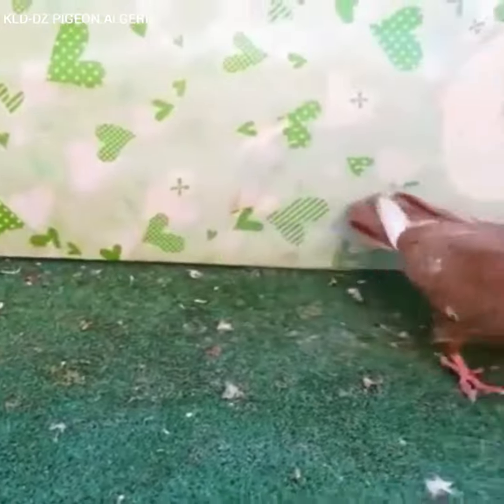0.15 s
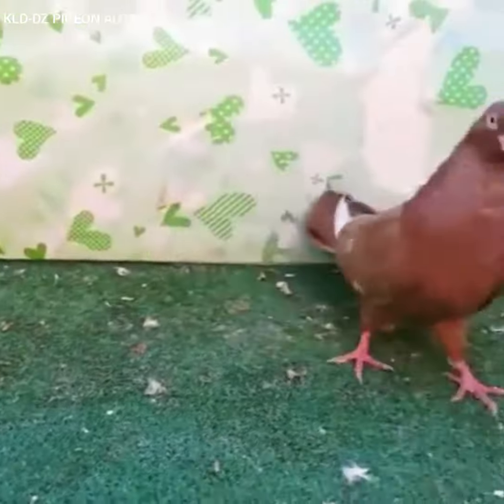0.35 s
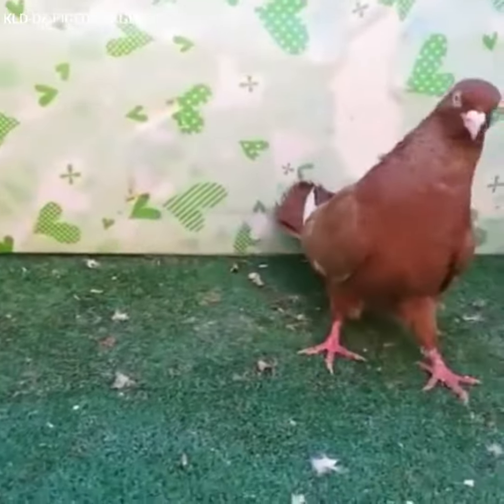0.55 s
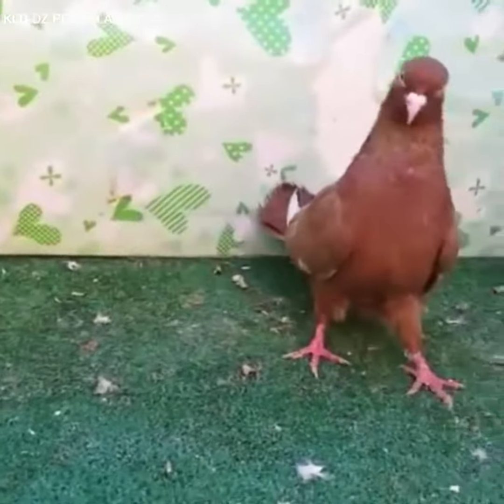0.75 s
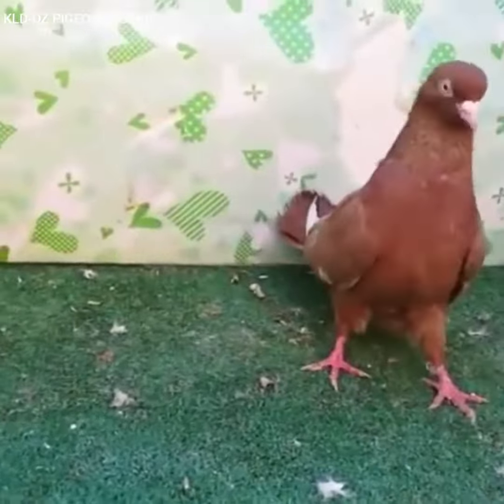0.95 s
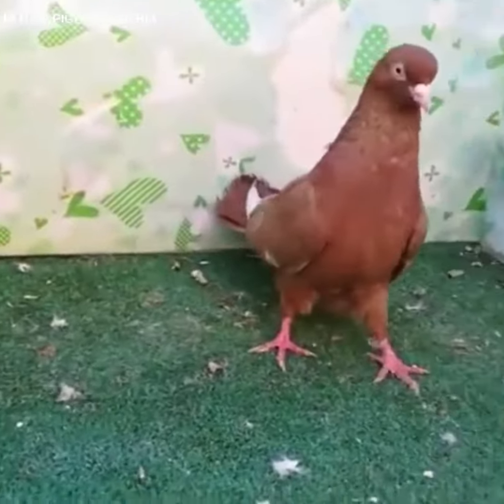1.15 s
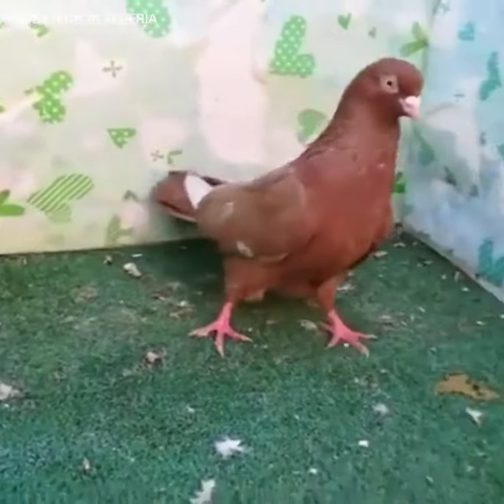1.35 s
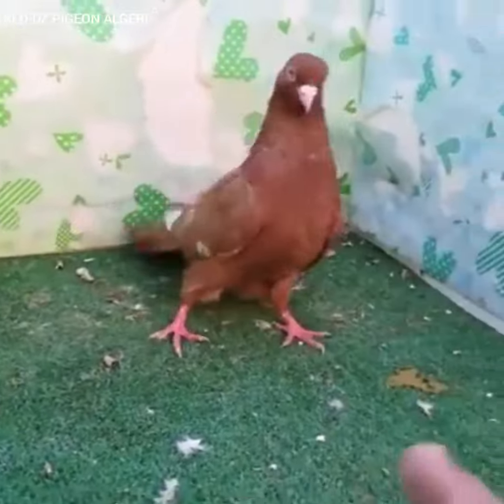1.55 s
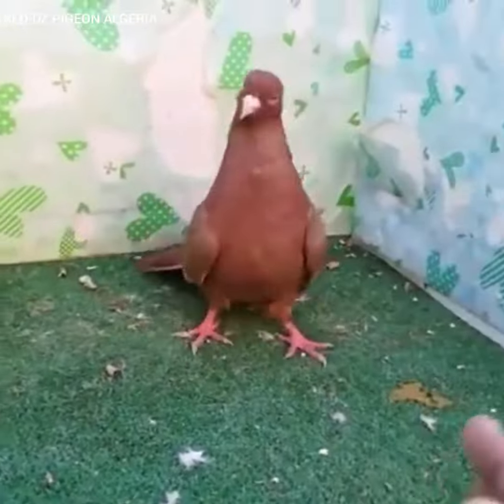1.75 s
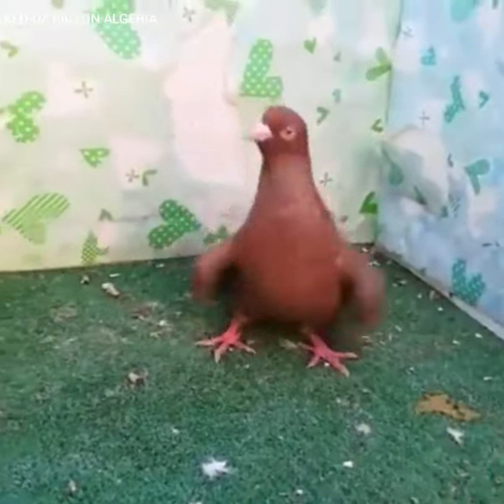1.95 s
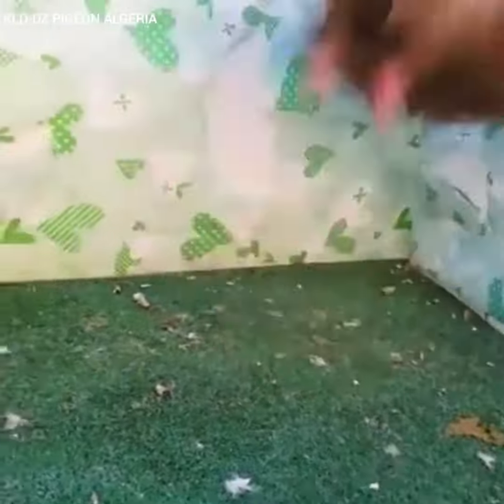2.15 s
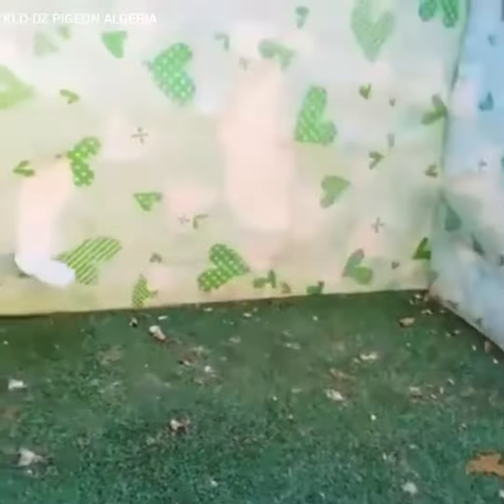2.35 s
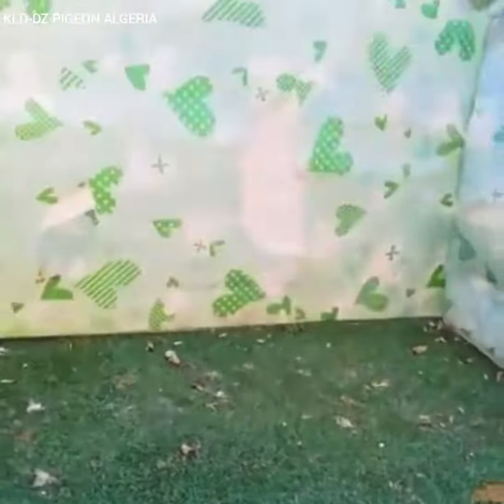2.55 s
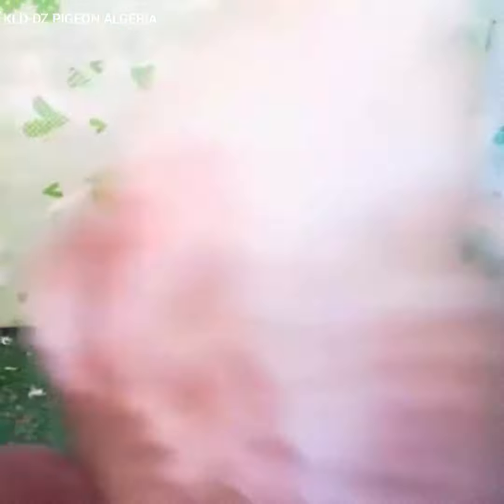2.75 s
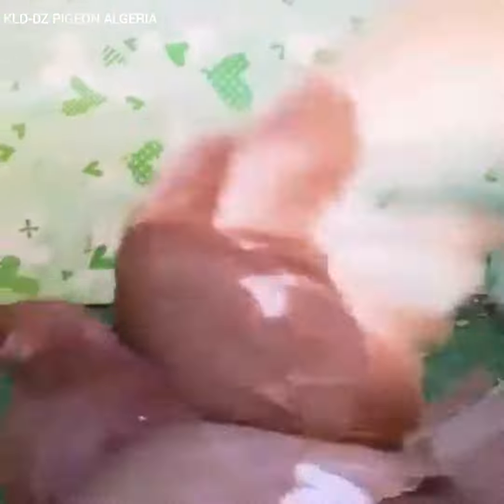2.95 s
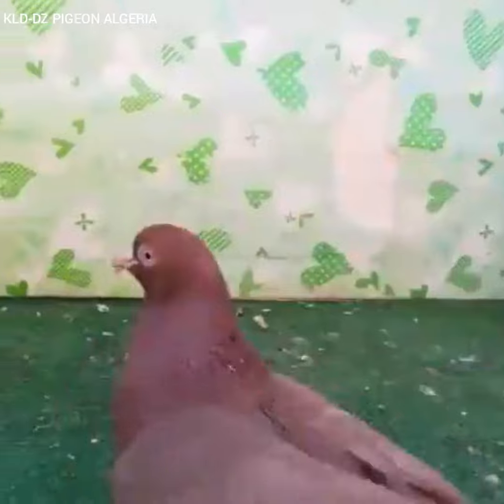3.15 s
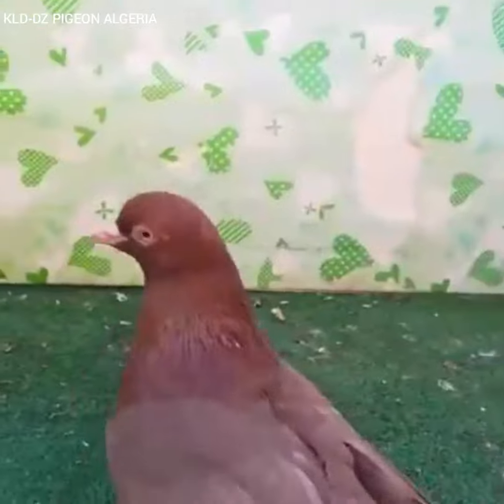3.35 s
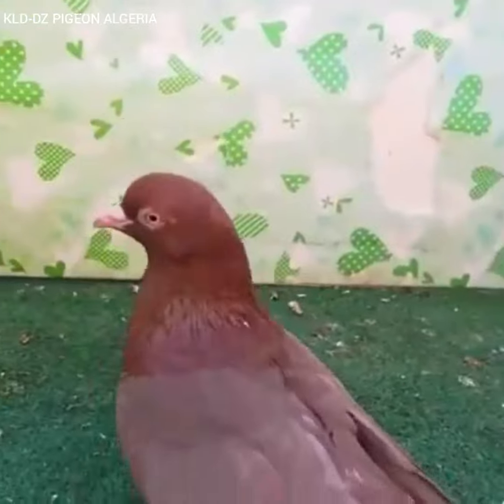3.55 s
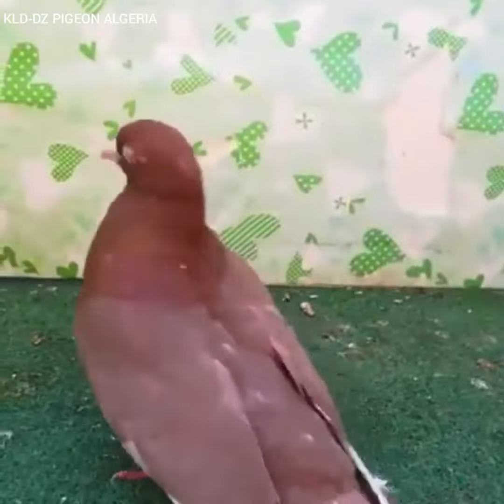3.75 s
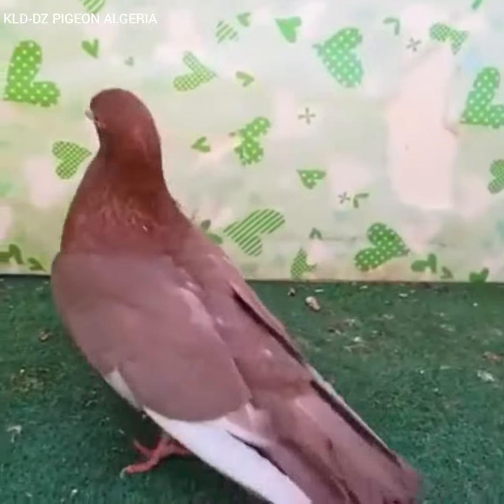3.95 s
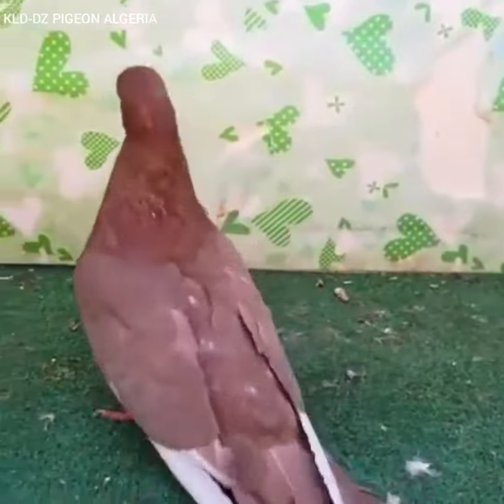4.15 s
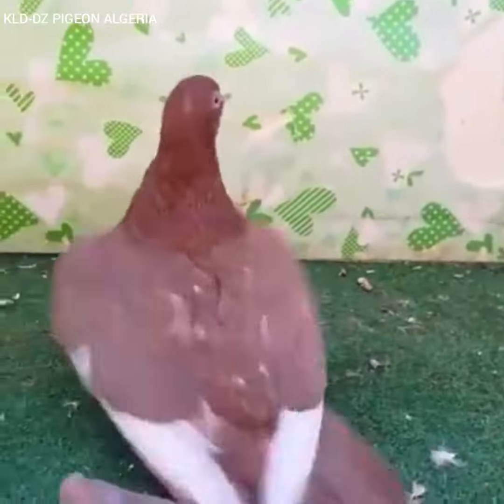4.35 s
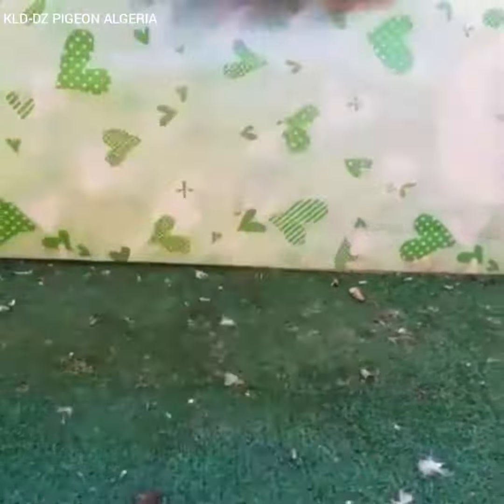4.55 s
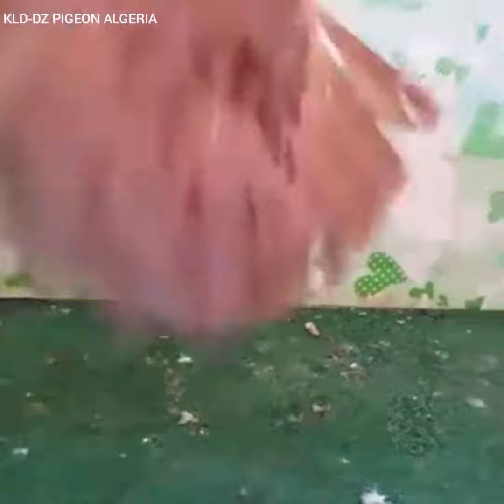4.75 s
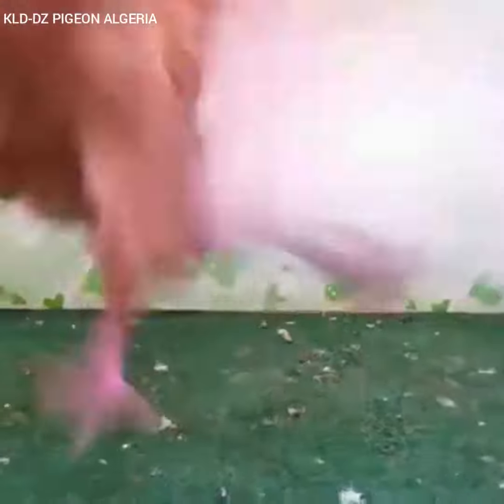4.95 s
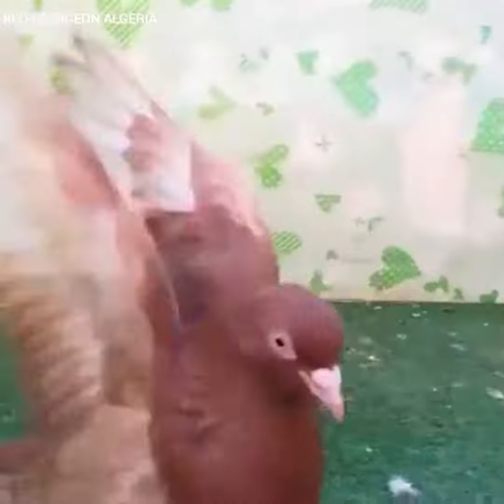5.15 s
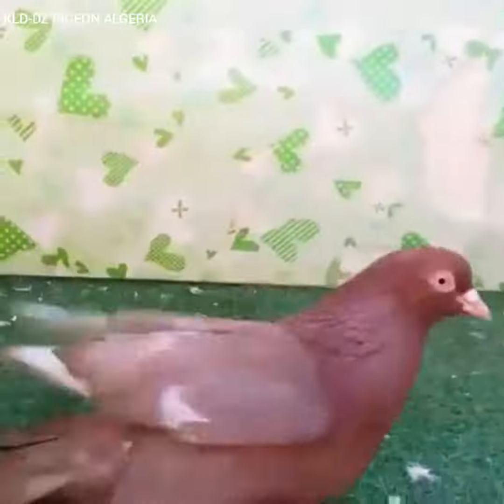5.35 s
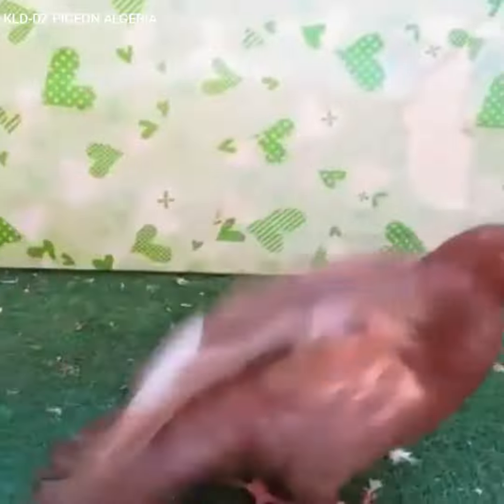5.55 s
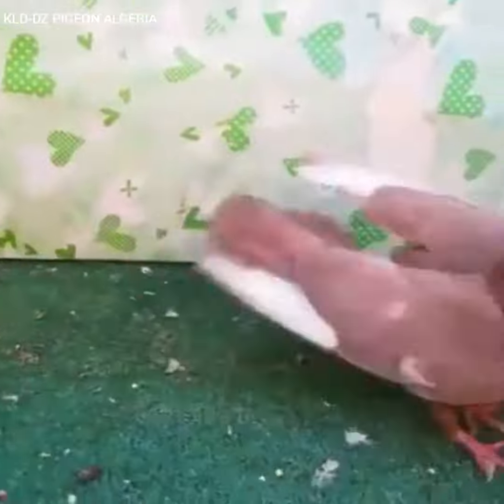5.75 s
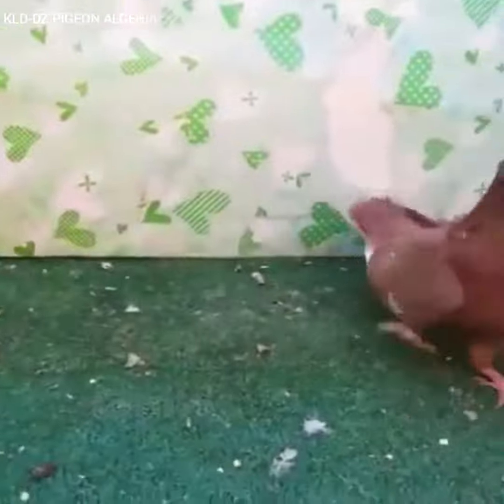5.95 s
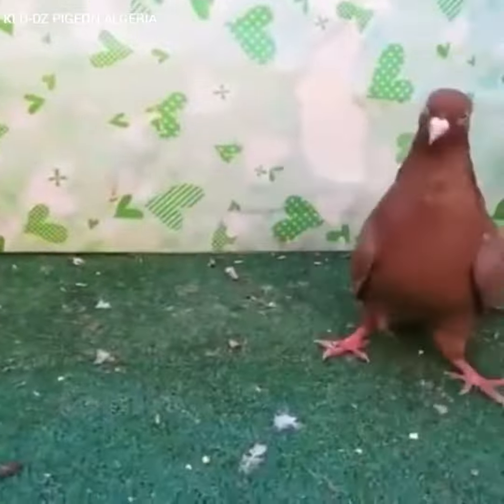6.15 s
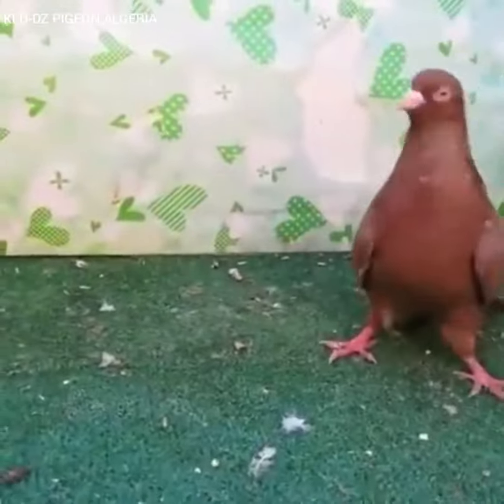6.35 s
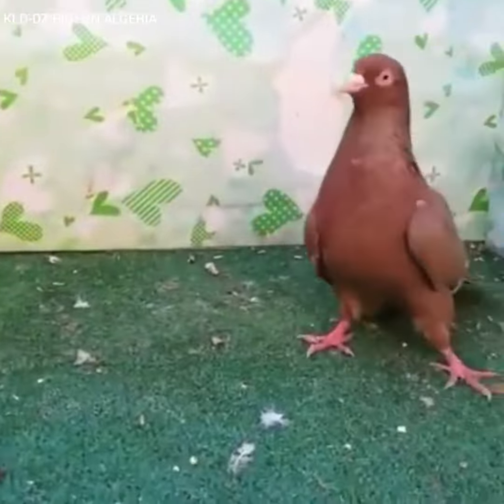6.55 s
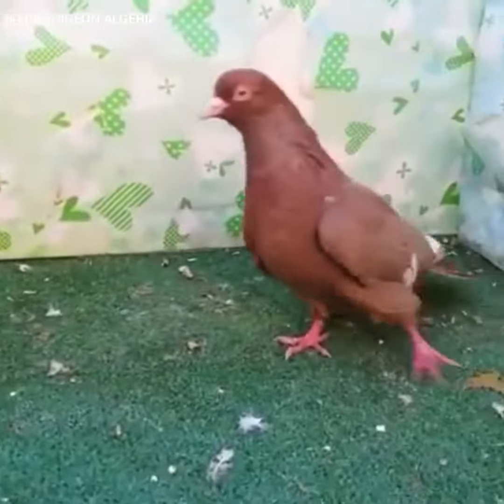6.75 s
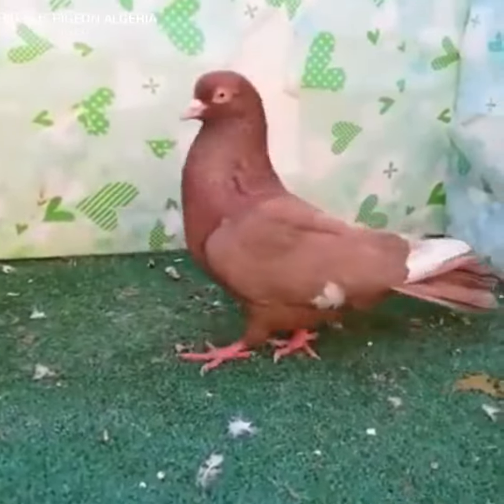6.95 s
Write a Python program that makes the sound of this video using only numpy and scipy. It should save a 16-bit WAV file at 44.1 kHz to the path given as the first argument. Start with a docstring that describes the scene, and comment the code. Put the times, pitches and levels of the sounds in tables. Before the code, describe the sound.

A pigeon close to the microphone bursts into loud, clapping wingbeats twice, with thumps and air buffeting, while small birds chirp steadily in a loft.

```python
"""Small birds chirp and pigeons coo in a loft; then a near pigeon takes off twice.
The birds are gliding near-pure tones, trilled in frequency; the room is sparse decaying taps.
Feathers swish as coloured noise, wings clap, slap and snap as short bursts, claws knock as damped resonances.
The downwash buffets the two microphone ports as low noise, low thumps and puffs of air around the bird
are dying sine swings, and struck cage wire rings faintly as wavering sines."""
import sys
import numpy as np
from scipy import signal
from scipy.fft import rfft, irfft
from scipy.io import wavfile
from scipy.ndimage import uniform_filter1d

SR = 44100
rng = np.random.default_rng(int(sys.argv[2]) if len(sys.argv) > 2 else 0)


def transcribe(signal):
    """Save signal, clipped to [-1, 1], as a 16-bit WAV file at the path in sys.argv[1]."""
    frames = np.atleast_2d(signal).T
    limited = np.clip(frames, -1, 1)
    pcm = np.round(limited * 32767).astype(np.int16)
    wavfile.write(sys.argv[1], SR, pcm)


N = 312228
TIME, BINS = np.arange(N) / SR, np.fft.rfftfreq(N, 1 / SR)


def amp(db):
    """Decibels to gain."""
    return 10 ** (np.asarray(db) / 20)


def unit(x):
    """Scales to rms 1."""
    return x / np.sqrt(np.mean(x ** 2) + 1e-20)


def read(points, hz):
    """Reads a table on a log-frequency axis."""
    f, value = np.transpose(points)
    return np.interp(np.log(hz + 1), np.log(f + 1), value)


def add(mix, s, sound):
    """Adds a sound into the mix at time s, cut off at the end of the mix."""
    part = mix[..., max(round(s * SR), 0):][..., :sound.shape[-1]]
    part += sound[..., :part.shape[-1]]


def colour(x, spectrum, treble_db=0):
    """Filters by a spectrum, with a see-saw around 5 kHz; rms 1."""
    hz = np.fft.rfftfreq(x.shape[-1], 1 / SR)
    tilt = treble_db * np.clip(np.log2((hz + 1) / 5000), -1, 1)
    filtered = irfft(rfft(x) * amp(read(spectrum, hz) + tilt), x.shape[-1])
    return unit(filtered)


def wander(size, rate_hz):
    """Smooth random movement, mostly slower than the given rate, about rms 1."""
    padded = size + SR // 4
    hz = np.fft.rfftfreq(padded, 1 / SR)
    spectrum = rfft(rng.standard_normal(padded)) / (1 + (hz / rate_hz) ** 4)
    return unit(irfft(spectrum))[:size]


def patchy(x, depth_db, size):
    """Lets the colour shift in small random patches; size is (frequency bins, time frames)."""
    z = signal.stft(x, nperseg=256)[2]
    field = uniform_filter1d(rng.standard_normal(z.shape[1:]), size[0], axis=0)
    field = uniform_filter1d(field, size[1], axis=1)
    gain = unit(amp(depth_db * unit(field)))
    return signal.istft(z * gain, nperseg=256)[1][:, :N]


def ringing(size, hz, width_hz):
    """Noise in one resonance, for each ear."""
    bins = np.fft.rfftfreq(size, 1 / SR)
    noise = rfft(rng.standard_normal((2, size)))
    return unit(irfft(noise / (1 + ((bins - hz) / width_hz) ** 2), size))


def envelope(length, attack, release):
    """Rounded attack, hold and release, all in seconds."""
    t = np.arange(0, length, 1 / SR)
    rise = np.sin(np.pi / 2 * np.minimum(t / attack, 1))
    fall = np.sin(np.pi / 2 * np.minimum((length - t) / release, 1))
    return rise * fall


def sides(balance_db):
    """Left and right gains for a level difference."""
    return amp(np.array([[.5], [-.5]]) * balance_db)


# Decay of the loft. Each row: frequency in Hz, t60 in seconds.
LOFT_DECAY = [(200, 0.018), (1000, 0.46), (2400, 0.37), (4000, 0.34), (10000, 0.14)]


def room(x):
    """Reverberation of the loft: sparse random taps, each band dying at its own speed."""
    size = SR // 2
    sparse = rng.random((2, size)) < .1
    after_gap = np.arange(size) > 150  # samples of silence before the first tap
    taps = rng.standard_normal((2, size)) * sparse * after_gap
    hz, t, z = signal.stft(taps, SR, nperseg=256)
    decay = amp(-60 * t / read(LOFT_DECAY, hz)[:, None])
    tail = signal.istft(z * decay, SR, nperseg=256)[1]
    return signal.fftconvolve(np.atleast_2d(x), tail / np.linalg.norm(tail[0]), axes=1)[:, :N]


def walls(x, echo, count=3):
    """Nearby surfaces return a sound within milliseconds, differently each time and for each ear."""
    out = x.copy()
    for ear in range(2):
        for delay in rng.uniform(.0004, .005, count):
            add(out[ear], delay, echo * x[ear])
    return out / np.sqrt(1 + count * echo ** 2)


# Spectrum of the surroundings. Each row: frequency in Hz, relative level in dB.
AMBIENCE_SPECTRUM = [(12, -23), (20, 8), (59, 4), (217, -1), (285, 5), (416, -3.5), (546, -14.5),
                     (819, -7.5), (1020, -11), (2360, -10), (3540, -12.5), (4280, -13), (5770, -9),
                     (7560, -11.5), (11300, -40), (12800, -84)]
# How alike the two ears are. Each row: frequency in Hz, left-right correlation from 0 to 1.
EAR_LIKENESS = [(50, 1), (150, 1), (300, 0.92), (600, 0), (12000, 0.024)]


def ambience(early_db=-50, late_db=-54):
    """Uneven noise wash, alike in both ears only in the bass; it dies down once the bird has settled."""
    left, other = rfft(rng.standard_normal((2, N)))
    same = read(EAR_LIKENESS, BINS)
    right = same * left + np.sqrt(1 - same ** 2) * other
    pair = irfft(np.array([left, right]), N)
    uneven = patchy(pair, depth_db=3, size=(3, 30)) * amp(1.8 * wander(N, 7))
    level_db = np.interp(TIME, [5.9, 6.5], [early_db, late_db])
    return amp(level_db) * colour(uneven, AMBIENCE_SPECTRUM)


# Cage wires set ringing. Each row: start in seconds, pitch in Hz, starting level in dB, t60 in seconds.
WIRE_RINGS = [(2.77, 414.5, -48, 7), (2.77, 1157, -53, 3), (5.268, 872, -49, 2.2), (5.268, 308, -57, 5)]


def wires():
    """Thin, long rings after a wing strikes the cage; they waver in pitch and strength."""
    out = np.zeros(N)
    for s, hz, db, t60 in WIRE_RINGS:
        turns = np.cumsum(hz + 5 * wander(N, 30)) / SR
        waver = unit(amp(3.5 * wander(N, 14)))
        add(out, s, amp(db - 60 * TIME / t60) * waver * np.sin(2 * np.pi * turns))
    return out


def call(row, jitter, jitter_hz, trill, trill_hz, octave_db, attack, release):
    """One near-pure note that arches through three pitches; a trill breaks it into quick downward sweeps."""
    s, length, first, middle, last, db = row
    t = np.arange(0, length, 1 / SR)
    arch = np.polyfit([0, length / 2, length], [first, middle, last], 2)
    # each note draws its own trill rate around trill_hz
    beat = 2 * np.pi * (trill_hz * rng.uniform(0.694, 1.3) * t + rng.random())
    sweep = np.sin(beat) + np.sin(2 * beat) / 2
    pitch = np.polyval(arch, t) * (1 + jitter * wander(len(t), jitter_hz) + trill * sweep)
    phase = 2 * np.pi * np.cumsum(pitch) / SR
    tone = unit(np.sin(phase) + amp(octave_db) * np.sin(2 * phase))
    return amp(db) * tone * np.minimum(t / attack, 1) * np.minimum((length - t) / release, 1)


NOTE_ARCH = 0.0189  # a note's middle lies this share above the straight glide


def glided(s, length, first, last, db):
    """Arches a glide slightly: start s, length s, starting, middle and ending Hz, relative level dB."""
    return s, length, first, (first + last) / 2 * (1 + NOTE_ARCH), last, db


# Coos. Each row: start in seconds, length in seconds, starting pitch in Hz, ending pitch in Hz,
# relative level in dB.
COO_NOTES = [(0, 0.17, 258.7, 234.4, -45.5), (0.087, 0.091, 411, 394, -48), (0.723, 0.074, 262, 303, -41),
             (0.851, 0.027, 322, 327, -38.5), (0.937, 0.023, 288, 310, -45), (1.131, 0.055, 390, 300, -43),
             (1.16, 0.22, 272.3, 237.6, -42.5), (1.381, 0.12, 309, 213, -39.5),
             (3.026, .24, 337.5, 275.4, -39), (4.316, 0.031, 356, 340, -41.5),
             (4.412, 0.027, 335, 330, -38.5), (6.507, 0.16, 415, 322, -48)]
COO_SETTLE = 0.671  # share of its glide that a coo has covered at half time


def coos(direct_db=-7, wet_db=-3.0, throb_db=3.5, throb_hz=45):
    """Soft, low notes of pigeons further off, throbbing as the crop swells."""
    out = np.zeros(N)
    for s, length, first, last, db in COO_NOTES:
        row = (s, length, first, first + COO_SETTLE * (last - first), last, db)
        note = call(row, jitter=0.071, jitter_hz=89, trill=0, trill_hz=0,
                    octave_db=-26.0, attack=0.0056, release=0.015)
        add(out, s, note)
    out = out * amp(throb_db * wander(N, throb_hz))
    return amp(direct_db) * out + amp(wet_db) * room(out)


TWITTER_LOW_HZ, TWITTER_TOP_HZ = 3603, 5210  # pitch range of the stray calls; the low end limits the rest


def twitter(db=-46.0, spread_db=3, pitch_spread=.22, fall_hz_per_s=26000, length=0.02575, lag=.035,
            stray_db=-50, stray_per_s=14, count=130):
    """Birds further off join in near the pitch of the close ones and call between them: thin, falling notes."""
    out, fall = np.zeros(N), fall_hz_per_s * length
    # answers, each up to one lag behind the start of a close note
    for which, when, height, loud in rng.random((count, 4)):
        s, _, first, last, *_ = CHIRP_NOTES[int(which * len(CHIRP_NOTES))]
        hz = max((first + last) / 2, TWITTER_LOW_HZ) * (1 + pitch_spread * (2 * height - 1))
        level_db = db + spread_db * (2 * loud - 1)
        row = glided(s + lag * when, length, hz + fall / 2, hz - fall / 2, level_db)
        note = call(row, jitter=0.0069, jitter_hz=300, trill=0.0099, trill_hz=51,
                    octave_db=-44, attack=0.012, release=0.0019)
        add(out, row[0], note)
    # stray calls at any time
    for when, height, loud in rng.random((round(stray_per_s * N / SR), 3)):
        hz = TWITTER_LOW_HZ + height * (TWITTER_TOP_HZ - TWITTER_LOW_HZ)
        level_db = stray_db + spread_db * (2 * loud - 1)
        row = glided(when * N / SR, length, hz + fall / 2, hz - fall / 2, level_db)
        note = call(row, jitter=.007, jitter_hz=300, trill=.06, trill_hz=75,
                    octave_db=-43, attack=.006, release=.004)
        add(out, row[0], note)
    return out * .4 + room(out) * 0.56


# Notes of the small birds. Each row: start in seconds, length in seconds, starting pitch in Hz,
# ending pitch in Hz, relative level in dB, trill against the clean whistle in dB before their own gains.
CHIRP_NOTES = [(0, 0.016, 4920, 3860, -41, 0.5), (.072, .048, 5800, 4940, -54, -24),
               (.088, 0.021, 2210, 2390, -46, -14), (.1, 0.04, 2990, 3130, -46.5, -7),
               (.152, 0.037, 4910, 4130, -43, -4), (.195, 0.048, 4310, 3860, -43, -2),
               (.228, 0.025, 4320, 4470, -33.5, -14), (.25, 0.029, 4280, 3570, -36.5, -4),
               (.305, 0.069, 3630, 2933, -41.5, -4), (.56, 0.029, 4770, 3860, -39, -9),
               (.592, 0.016, 4330, 3900, -37.5, -4), (.612, 0.043, 3600, 3064, -45, 0),
               (.722, 0.034, 4100, 3230, -49, 2), (.762, 0.034, 2410, 1640, -46, -22),
               (.788, 0.031, 3860, 2960, -44, 1.5), (.86, 0.043, 4700, 4050, -42, -4),
               (.925, 0.029, 3330, 2760, -41, -1), (.928, 0.016, 4570, 3920, -34.5, -6),
               (.953, 0.014, 4420, 3650, -36, -14), (.97, 0.039, 3530, 3080, -46.5, -3),
               (1.06, 0.02, 4250, 4930, -44, -3), (1.082, 0.02, 3480, 4550, -37.5, -8),
               (1.113, 0.0077, 4060, 4550, -30, -7), (1.127, 0.0087, 4460, 4590, -41, 3),
               (1.176, 0.01, 4150, 4310, -33.5, -3), (1.2, 0.039, 4260, 3640, -42.5, -1),
               (1.24, 0.031, 3660, 2945, -38, -4), (1.37, 0.018, 4260, 4930, -40, -11),
               (1.385, 0.042, 4730, 3710, -39, -2.5), (1.44, 0.043, 3690, 3045, -50, 4.5),
               (1.537, 0.018, 4170, 5100, -42, -1), (1.559, 0.018, 4440, 4290, -33.5, -26),
               (1.645, 0.014, 3600, 3170, -43, -10), (1.655, 0.027, 4185, 4080, -37, -5),
               (1.872, 0.013, 2800, 2950, -43, -15), (1.895, 0.034, 5140, 4070, -45, 0),
               (1.924, 0.051, 3560, 3800, -39, -5), (1.98, .018, 3320, 2800, -40.5, -1),
               (1.982, 0.02, 4400, 4200, -39, -10), (2.001, 0.028, 3100, 2950, -39.5, -5),
               (2.014, 0.011, 4170, 4360, -39, -6), (2.035, .03, 3900, 3100, -53, 0),
               (2.068, .024, 3120, 2260, -46.5, -2), (2.92, 0.036, 4460, 3710, -37, 1),
               (3.042, 0.044, 5350, 4090, -41.5, 3), (3.162, 0.03, 4020, 3530, -39, 0.5),
               (3.413, 0.018, 3790, 5100, -45.5, -3), (3.435, 0.061, 5200, 4320, -43.5, -1.5),
               (3.508, 0.039, 3970, 4560, -37, -2.5), (3.55, 0.044, 4700, 5820, -42.5, -0.5),
               (3.608, 0.034, 3900, 4480, -37, -9), (3.755, 0.039, 5260, 4340, -44, -1.5),
               (3.785, 0.029, 3360, 3160, -44.5, -3), (3.896, 0.018, 4510, 3880, -35.5, -4),
               (3.93, 0.047, 4690, 4460, -43, -4), (3.96, 0.049, 3590, 3180, -48, 3),
               (4.078, 0.057, 5100, 4400, -44.5, 0.5), (4.138, 0.037, 4200, 3160, -38.5, -2),
               (4.185, 0.032, 4280, 5350, -39, -16), (4.215, 0.022, 4680, 3935, -34, -8),
               (4.244, 0.015, 4480, 3760, -34, -1), (4.269, 0.014, 3826, 4400, -28.5, -5),
               (4.32, 0.026, 4020, 4080, -30.5, -19), (4.363, 0.038, 3126, 1990, -44.5, -17),
               (4.383, 0.025, 3750, 2800, -48, -18), (4.425, 0.014, 2710, 2300, -50, -22),
               (4.464, 0.016, 2780, 2620, -44, -13), (5.489, 0.054, 4160, 3920, -38.5, -6.5),
               (5.545, 0.023, 3890, 3140, -39.5, -1), (5.672, 0.025, 4600, 5150, -38, -10),
               (5.843, 0.025, 4860, 4300, -49, 1), (5.886, 0.021, 4180, 3950, -38.5, -2.5),
               (5.935, 0.053, 3244, 3140, -49, 1), (6.182, 0.029, 3320, 4600, -49.5, -1),
               (6.213, 0.031, 4420, 3690, -40.5, -2), (6.255, 0.037, 3504, 4220, -36.5, -3),
               (6.261, 0.013, 5450, 4560, -36.5, -10), (6.283, 0.014, 3780, 3270, -38, -7),
               (6.297, 0.019, 4150, 3100, -42, -11), (6.367, 0.014, 3900, 4960, -44, -19),
               (6.385, 0.051, 5220, 4270, -37, -14), (6.44, 0.017, 6800, 5420, -63, -13),
               (6.452, 0.017, 4170, 4580, -29.5, -14), (6.472, 0.043, 4060, 3210, -44, -2.5),
               (6.52, 0.048, 2725, 2296, -46, -1.5), (6.53, 0.049, 4490, 3755, -48, 1),
               (6.56, 0.044, 2760, 2540, -52, -8), (6.6, 0.031, 3670, 3250, -44.5, -9),
               (6.783, 0.026, 5280, 4350, -42.5, 1.5), (6.8, 0.084, 4290, 3190, -42.5, -1),
               (6.862, 0.039, 4710, 5140, -40, -3.5), (6.89, .06, 4350, 3320, -44.5, -3),
               (6.972, 0.038, 2690, 2240, -48.5, -20), (7.028, 0.012, 6250, 5740, -43, -6)]
CHIRP_WET_DB, TRILL_WET_DB = -3.3, 0  # room level against the near sound


def chirps(whistle_db=-2.26, trill_db=-4.0, trill=0.1406, trill_hz=75, flutter_db=1.0, flutter_hz=110,
           overtone_db=-32, count=6):
    """Small birds on several perches: one side of the syrinx whistles cleanly, the other adds a wide trill."""
    whistles, trills = np.zeros((count, 2, N)), np.zeros((2, N))
    for k, (s, length, first, last, db, share_db) in enumerate(CHIRP_NOTES):
        row = glided(s, length, first, last, db)
        note = call(row, jitter=.007, jitter_hz=300, trill=.008, trill_hz=60,
                    octave_db=-28, attack=.003, release=.005)
        note = note * unit(amp(flutter_db * wander(len(note), flutter_hz)))
        for ear in range(2):
            add(whistles[k % count, ear], s + rng.uniform(0, .0006), note)
        warble = call(row, jitter=0.0072, jitter_hz=400, trill=trill, trill_hz=trill_hz,
                      octave_db=overtone_db, attack=0.0026, release=0.0049)
        add(trills, s, amp(share_db) * warble)
    near = sum(walls(perch, .45) for perch in whistles)
    whistled = near + amp(CHIRP_WET_DB) * room(whistles.sum(0))
    trilled = walls(trills, .35) + amp(TRILL_WET_DB) * room(trills)
    return amp(whistle_db) * whistled + amp(trill_db) * trilled


# Air noise common to both ports. Each row: frequency in Hz, relative level in dB.
AIR_COMMON = [(11, -29), (18, 3.5), (70, 1.5), (118, -4.5), (152, -3.5), (270, -6), (432, -17),
              (537, -42.5), (817, -19), (1000, -42), (1300, -31.5), (2200, -120)]
# Air noise opposed between the ports. Each row: frequency in Hz, relative level in dB.
AIR_OPPOSED = [(18, -64), (30, -44), (105, 7), (160, 7.5), (249, 1), (313, 13), (475, 4), (530, -19),
               (637, 5), (1200, -20), (1560, -32), (2640, -120)]
# Draught around the bird, one list for each flight and landing.
# Each row: time in seconds, relative level in dB.
DRAUGHT_CURVES = [
    [(2.0, -89), (2.12, -48), (2.22, -30), (2.76, -34.5), (2.85, -29.5), (2.98, -30), (3.1, -35),
     (3.4, -40.5), (3.6, -74)],
    [(4.45, -61), (4.6, -33.5), (4.8, -35.5), (4.88, -22.5), (5.02, -22.5), (5.28, -34), (5.34, -24.5),
     (5.55, -41.5), (5.66, -45), (5.9, -45.5), (6.1, -82)],
]
AIR_LAG_S, AIR_ATTACK_S, AIR_RELEASE_S = 0.0029, 0.027, 0.035


def downwash(side_db=-9.0, gain_db=-3, lump_db=2.5, lump_hz=30):
    """Lumpy turbulence at the two ports: a puff just behind each wingbeat, over the draught of each flight."""
    common = colour(rng.standard_normal(N), AIR_COMMON)
    opposed = amp(side_db) * colour(rng.standard_normal(N), AIR_OPPOSED)
    push = np.zeros(N)
    for curve in DRAUGHT_CURVES:
        push += amp(np.interp(TIME, *np.transpose(curve), left=-120, right=-120))
    for s, length, *_, air_db in WING_STROKES:
        puff = envelope(length + AIR_LAG_S, AIR_ATTACK_S, AIR_RELEASE_S)
        add(push, s + AIR_LAG_S, amp(air_db) * puff)
    lumps = unit(amp(lump_db * wander(N, lump_hz)))
    return amp(gain_db) * push * lumps * np.array([common + opposed, common - opposed])


# Low thumps and puffs of air around the bird. Each row: start in seconds, level in dB, pitch in Hz.
LOW_THUMPS = [(0.752, -31.5, 189), (1.792, -34, 170), (2.845, -27.5, 87), (3.043, -22.5, 83),
              (4.697, -18.5, 46), (4.907, -10, 89), (4.914, -8, 128), (4.955, -10, 80.5),
              (5.329, -10.5, 131), (5.359, -17.5, 99), (5.386, -13, 212), (5.402, -10, 140),
              (5.47, -13.5, 119), (5.542, -23.5, 62), (5.623, -19, 110), (5.745, -33.5, 102),
              (6.156, -34.5, 164), (6.891, -44, 164)]


def thumps(cycles=1.0, overtone=0.32, lag=0.00074):
    """Low thumps and puffs of air: a sine swing that dies within a cycle or two, later at the right port."""
    out, t = np.zeros((2, N)), np.arange(6000) / SR
    for s, db, pitch in LOW_THUMPS:
        turns = pitch * np.maximum(t - np.array([[0], [lag]]), 0)
        swing = np.sin(2 * np.pi * turns) - overtone * np.sin(2 * np.pi * 2.3 * turns)
        add(out, s, amp(db) * swing * np.exp(-turns / cycles))
    return out


# Claws and beak knocking on the pen. Each row: start in seconds, level in dB, pitch in Hz,
# decay in seconds.
PEN_KNOCKS = [(1.344, -53, 1060, .004), (1.762, -35, 816, 0.0078), (1.782, -37, 850, 0.0045),
              (4.253, -41.5, 1210, .003), (4.819, -18, 843, 0.0049), (4.894, -17, 683, 0.0054),
              (4.917, -21, 572, 0.0038), (4.949, -15, 756, 0.0054), (5.267, -28, 1010, .004),
              (5.465, -23.5, 1290, 0.0012)]


def knocks(rise=0.00059, width=0.53, scuff_db=-6, scuff_s=0.016):
    """Each knock rings one quickly damped resonance of the pen, with a scuff as the claw slides."""
    out, t = np.zeros((2, N)), np.arange(2048) / SR
    for s, db, pitch, decay in PEN_KNOCKS:
        tap = np.sin(2 * np.pi * pitch * t) * np.exp(-t / decay)
        scuff_fade = np.exp(-t / np.sqrt(decay * scuff_s))  # lasts between the tap and scuff_s
        scuff = amp(scuff_db) * ringing(len(t), pitch, width * pitch) * scuff_fade
        add(out, s, amp(db) * (tap + scuff) * np.minimum(t / rise, 1))
    return out


# A quill flicks sharply right by the microphone. Each row: start in seconds, relative level in dB.
QUILL_SNAPS = [(4.583, -18), (5.0615, -30)]
# Spectrum of a snap. Each row: frequency in Hz, relative level in dB.
SNAP_SPECTRUM = [(500, -6), (3800, -3), (7500, 0), (12000, -1), (14000, -22), (16000, -28)]


def snaps(decay=0.00057):
    """A single stiff quill lets go: a very short tick that reaches the top of the treble."""
    out, t = np.zeros((2, N)), np.arange(-128, 512) / SR
    blow = np.exp(-abs(t) / decay)
    blow_rms = np.sqrt(np.mean(blow ** 2))
    for s, db in QUILL_SNAPS:
        tick = colour(rng.standard_normal((2, len(t))) * blow, SNAP_SPECTRUM)
        add(out, s + t[0], amp(db) * blow_rms * tick)
    return out


# A whole wing slapping flat against the pen. Each row: start in seconds, length in seconds,
# relative level in dB, quill ring in dB, body pitch in Hz, body ring in dB, left-right balance in dB.
WING_SLAPS = [(2.168, 0.008, -20, -2.5, 950, -17, 1), (2.468, 0.0081, -18, -19, 3300, -6, 3.5),
              (2.667, 0.006, -17.5, -10, 1600, -13, -1), (2.724, 0.0062, -22, -5, 3500, -14, -1.5),
              (5.0126, 0.0064, -17.5, -1.5, 3460, -8.5, 0), (5.04, 0.0035, -18, 0, 2320, -8, 2),
              (5.0577, 0.0048, -13.5, -14, 4180, -0.5, 6.5), (5.2665, 0.0099, -21.5, -5, 1720, -7.5, 1.5)]
QUILL_HZ, QUILL_WIDTH_HZ = 6820, 610  # ring of the stiff flight feathers


def slaps(attack=0.0012, release=0.0033, body_width=0.42, tail_db=-14, tail_s=0.0034):
    """A wing lands flat: a dry burst that stops short, coloured by the quills and by what they strike."""
    out, t = np.zeros((2, N)), np.arange(-128, 1408) / SR
    for s, length, db, quill_db, body_hz, body_db, balance_db in WING_SLAPS:
        blow = amp(tail_db) * np.clip(t / attack, 0, 1) * np.exp(-abs(t - length / 2) / tail_s)
        add(blow, -t[0], envelope(length, attack, release))
        quills = amp(quill_db) * ringing(len(t), QUILL_HZ, QUILL_WIDTH_HZ)
        body = amp(body_db) * ringing(len(t), body_hz, body_width * body_hz)
        hit = rng.standard_normal((2, len(t))) + quills + body
        burst = colour(hit * blow, CRACK_SPECTRUM)
        add(out, s + t[0], amp(db) * np.sqrt(np.mean(blow ** 2)) * burst * sides(balance_db))
    return out


# Wing tips clapping and quills snapping. Each row: start in seconds, relative level in dB,
# decay in seconds, treble tilt in dB, left-right balance in dB.
WING_CLAPS = [(2.146, -40, 0.0027, -2, 0), (2.174, -27.5, 0.0053, -5, -2), (2.196, -20, 0.005, 0, -3),
              (2.279, -25.5, 0.0037, 10, -2), (2.312, -18.5, 0.0028, 4, -1), (2.346, -23, 0.0079, -2, 3),
              (2.3641, -14.5, 0.0019, 0, 8), (2.534, -17, 0.0047, 4, 4), (2.573, -20.5, 0.0024, 0, 13),
              (2.647, -17.5, 0.0039, -3, 4), (2.654, -15.5, 0.0067, -2, 2), (2.691, -21, 0.0043, 5, -2),
              (2.739, -33, 0.0028, -2, 4), (2.766, -21, 0.0076, 2.5, -8), (2.8425, -22.5, 0.0033, 0, 2),
              (4.583, -19.5, 0.0045, 4, 3.5), (4.608, -19, 0.0062, 25, -2), (4.636, -18.5, 0.0051, 7, -5),
              (4.917, -18, 0.0035, -6, 6), (4.929, -18.5, 0.0034, 1, 10), (4.992, -23.5, .003, -3, 4),
              (5, -23, 0.0028, -4, 2), (5.066, -23.5, 0.0054, -11, 7), (5.081, -29, .003, 13, 6),
              (5.22, -24, .0017, 0, 6)]
# Spectrum of a clap, shared by the slaps. Each row: frequency in Hz, relative level in dB.
CRACK_SPECTRUM = [(180, -45), (300, -7), (527, -6), (826, 1), (1090, -5), (1470, 0), (1880, -1),
                  (2670, -1.5), (3600, 1.5), (5690, -3), (7600, 1), (10500, -16), (11900, -26.5),
                  (12700, -73)]


def claps(attack=0.0011, echo=0.3, grain_db=3.0, grain_hz=900, lead=0.35):
    """Stiff primaries meet one after another: a dense crack that builds and dies within milliseconds."""
    out, t = np.zeros((2, N)), np.arange(-256, 1792) / SR
    edges = signal.windows.tukey(len(t), .12)
    for s, db, decay, treble_db, balance_db in WING_CLAPS:
        away = abs(t - attack)
        blow = np.where(t < attack, np.exp(-away / (lead * decay)), np.exp(-away / decay))
        grain = amp(grain_db * wander(len(t), grain_hz))
        crack = colour(rng.standard_normal((2, len(t))) * grain * blow, CRACK_SPECTRUM, treble_db) * edges
        level = amp(db) * np.sqrt(np.mean(blow ** 2))
        add(out, s + t[0], walls(level * crack * sides(balance_db), echo))
    return out


# Spectrum of rubbing feathers. Each row: frequency in Hz, relative level in dB.
FEATHER_SPECTRUM = [(180, -47), (300, -3), (527, -5), (826, 1), (1090, -2.5), (1470, -0.5), (1880, -2),
                    (2670, -3.5), (2990, -2), (5690, -1), (7600, -0.5), (10500, -14.5), (11900, -39),
                    (12500, -72), (14000, -90.5)]


def swish(swell, treble_db, darkening_db, grain_db=2.0, grain_hz=700, flutter_db=1.5, flutter_hz=90,
          echo=0.56):
    """Vanes slide over each other: a fine, soft rustle, fluttering as quill after quill passes."""
    size = len(swell)
    grain = amp(grain_db * wander(size, grain_hz) + flutter_db * wander(size, flutter_hz))
    rub, along = rng.standard_normal((2, size)) * grain, np.linspace(0, 1, size)
    early = colour(rub, FEATHER_SPECTRUM, treble_db + darkening_db / 2)
    late = colour(rub, FEATHER_SPECTRUM, treble_db - darkening_db / 2)
    sound = swell * ((1 - along) * early + along * late)
    return walls(np.pad(sound, ((0, 0), (0, 256))), echo)  # space for the echoes


# Wingbeats. Each row: start in seconds, length in seconds, relative level in dB, growth over the stroke
# in dB, treble tilt in dB, relative level of the air pushed at the microphone in dB.
WING_STROKES = [(2.166, 0.078, -23.5, 4.5, 1.5, -41), (2.276, 0.11, -25, 8.5, 1.5, -44),
                (2.391, 0.091, -24.5, 10.5, -1, -35), (2.511, 0.096, -24, -4, 1.5, -38),
                (2.591, 0.11, -25.5, -3, 0, -37), (2.753, 0.043, -24.5, 0, 3.5, -55),
                (4.594, 0.063, -24.5, -1, 0, -32), (4.665, .11, -38, -7, -1.5, -45),
                (4.784, .085, -29.5, 5.5, -1.5, -36), (4.868, 0.048, -28.5, -2, -2.5, -12.5),
                (4.908, .07, -25, -8, -0.5, -12), (5.05, 0.051, -29, -8, 2.5, -35),
                (5.181, 0.055, -32, 6, -4, -41)]
STROKE_ATTACK_S, STROKE_RELEASE_S = 0.0078, 0.028
DARKENING_DB = 3.5  # treble tilt lost from the start of a stroke to its end
# Soft feather rustle, both under the wingbeats and between flights. Each row: start in seconds,
# length in seconds, relative level in dB, treble tilt in dB.
FEATHER_RUSTLES = [(0.312, 0.31, -51.5, 7), (0.7, 0.18, -54, -4), (1.357, 0.13, -48, -5.5),
                   (1.575, 0.21, -42, 0.5), (1.743, 0.22, -42.5, -1.5), (1.933, 0.22, -47, 1.5),
                   (2.135, 0.061, -33, -0.5), (2.162, 0.24, -40, 2), (2.362, 0.69, -37, 1.5),
                   (2.876, 0.19, -35.5, -5), (3.027, 0.32, -39, -2), (3.371, 0.21, -45.5, 5.5),
                   (3.748, 0.24, -46.5, 1), (4.539, 0.081, -37.5, 3), (4.759, 0.09, -34.5, 0.5),
                   (4.956, 0.086, -35.5, -1.5), (5.07, 0.23, -39, -1.5), (5.696, 0.12, -42.5, .5),
                   (5.807, 0.24, -47, -4), (6.202, 0.074, -55, -5), (6.778, 0.22, -53.5, 2)]
RUSTLE_CREST = 0.34  # share of its length that a rustle takes to build
RUSTLE_LURCH_DB, RUSTLE_LURCH_HZ = 2.5, 22  # the rustle's level lurches up and down


def swishes():
    """Wingbeats start bright and darken as the wing spreads; rustles swell and fade gently."""
    out = np.zeros((2, N))
    for s, length, db, growth_db, treble_db, _ in WING_STROKES:
        stroke = envelope(length, STROKE_ATTACK_S, STROKE_RELEASE_S)
        level = amp(db + growth_db * np.linspace(-.5, .5, len(stroke)))
        add(out, s, swish(stroke * level, treble_db, DARKENING_DB))
    for s, length, db, treble_db in FEATHER_RUSTLES:
        swell = envelope(length, RUSTLE_CREST * length, (1 - RUSTLE_CREST) * length) ** 0.73
        lurch = unit(amp(RUSTLE_LURCH_DB * wander(len(swell), RUSTLE_LURCH_HZ)))
        add(out, s, swish(amp(db) * swell * lurch, treble_db, 0))
    return patchy(out, depth_db=2.8, size=(4, 6))


def scene(wings_db=-1, wings_wet_db=-15):
    """The near pigeon, almost dry, in front of the other birds."""
    wings = amp(wings_db) * (swishes() + claps() + slaps() + snaps()) + knocks()
    pigeon = wings + amp(wings_wet_db) * room(wings) + thumps() + downwash()
    return pigeon + chirps() + twitter() + coos() + wires() + ambience()


# Tone of the two microphone ports. Each row: frequency in Hz, left-right difference in dB.
PORT_BALANCE = [(100, 0), (700, 3), (2000, 2), (4200, 1), (5500, -1), (7300, -11), (8800, -1.5),
                (11000, -2)]
EDGE_HZ = 16100  # upper band limit


def record(dry):
    """The two ports colour the sound differently; then a low-pass sets the band limit."""
    coloured = irfft(rfft(dry) * sides(read(PORT_BALANCE, BINS)), N)
    low_pass = signal.firwin(255, EDGE_HZ, window=("kaiser", 8), fs=SR)
    return signal.oaconvolve(coloured, low_pass[None], "same", axes=1)


dry = scene()
out = record(dry)
transcribe(out)
```